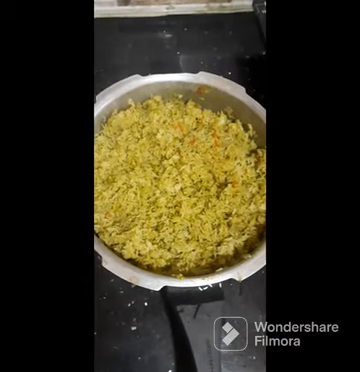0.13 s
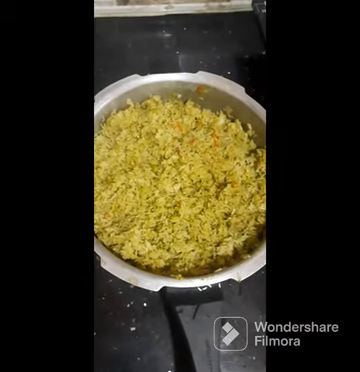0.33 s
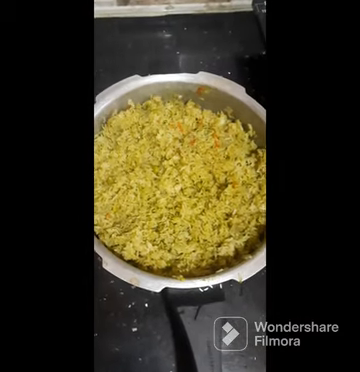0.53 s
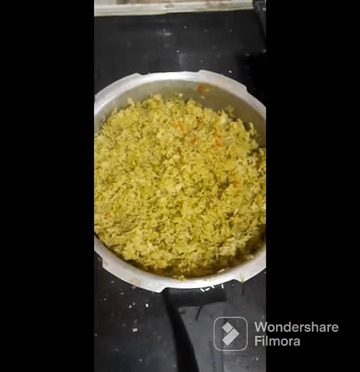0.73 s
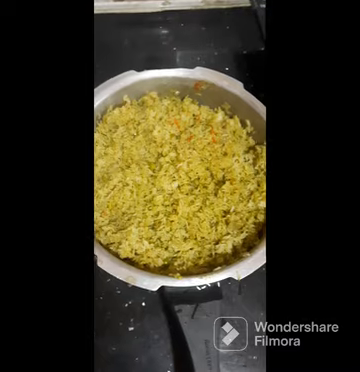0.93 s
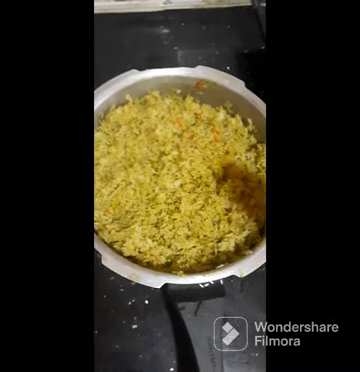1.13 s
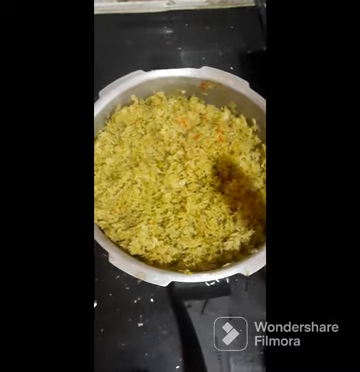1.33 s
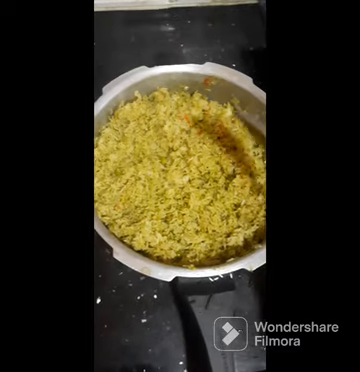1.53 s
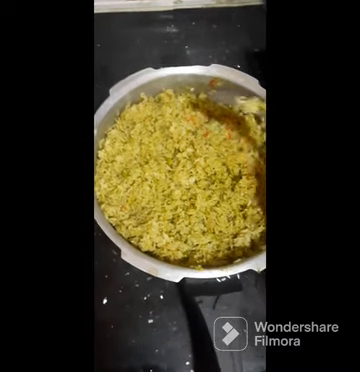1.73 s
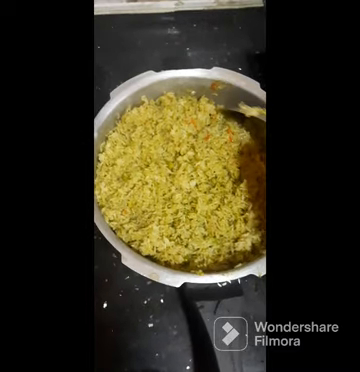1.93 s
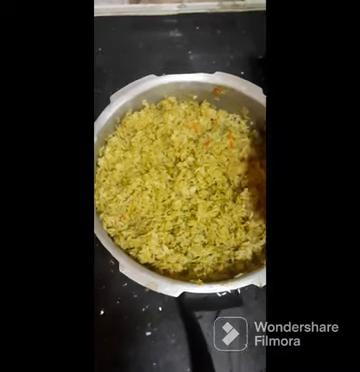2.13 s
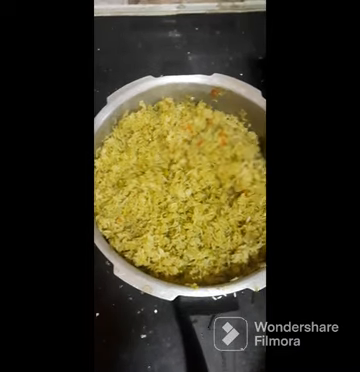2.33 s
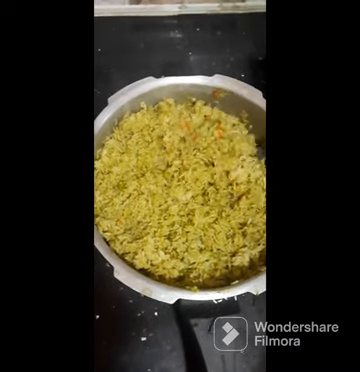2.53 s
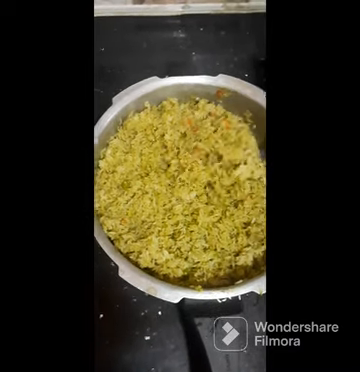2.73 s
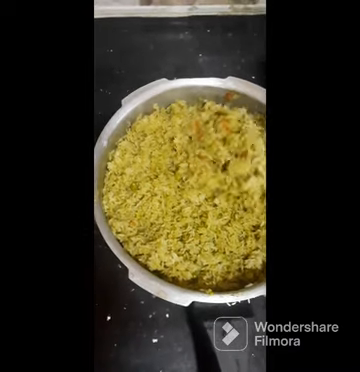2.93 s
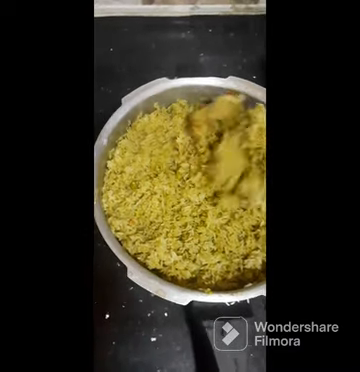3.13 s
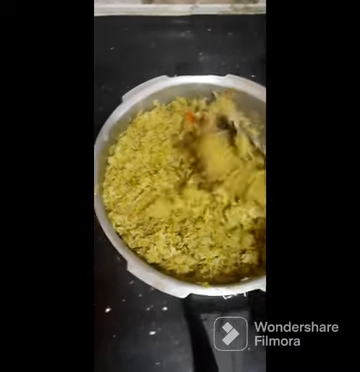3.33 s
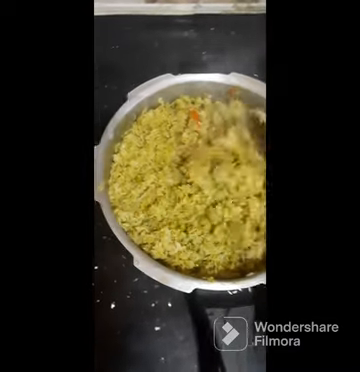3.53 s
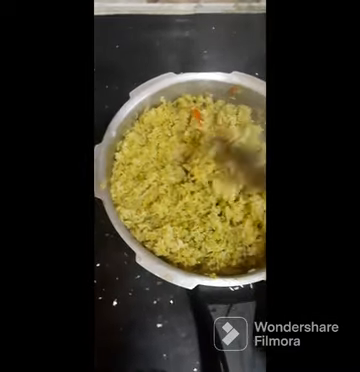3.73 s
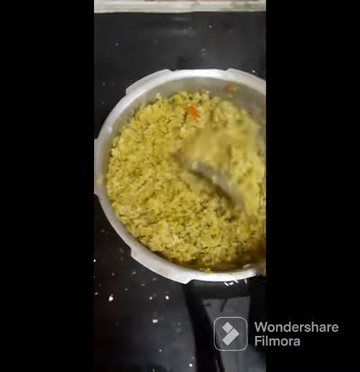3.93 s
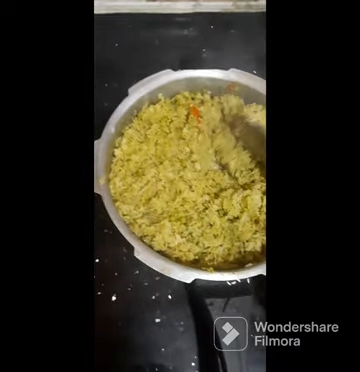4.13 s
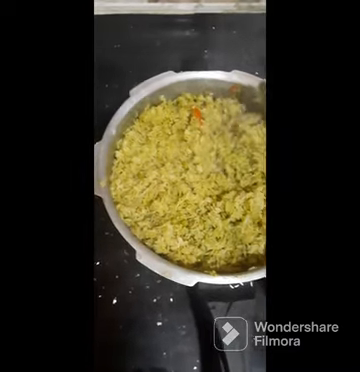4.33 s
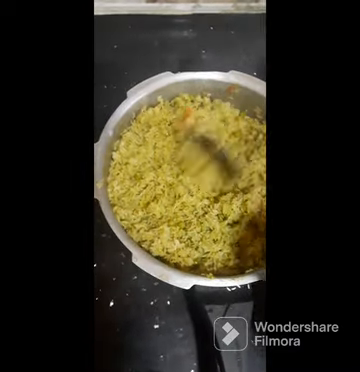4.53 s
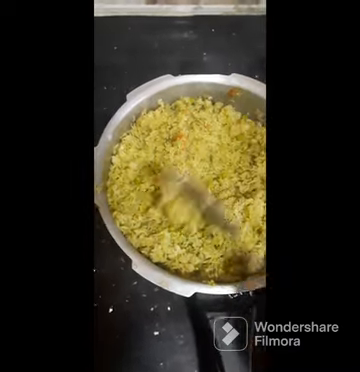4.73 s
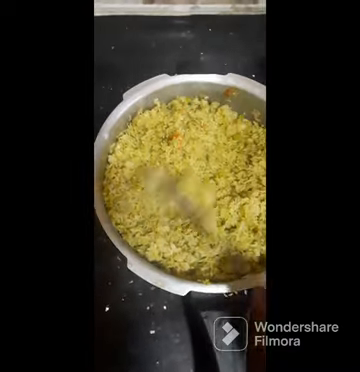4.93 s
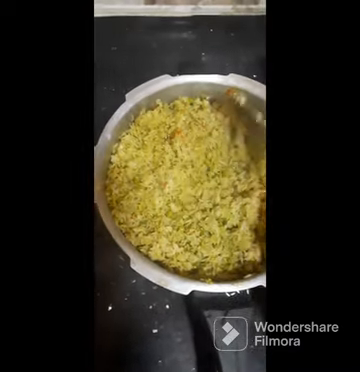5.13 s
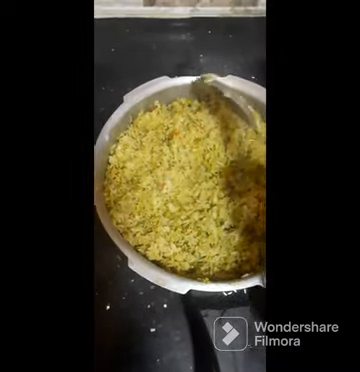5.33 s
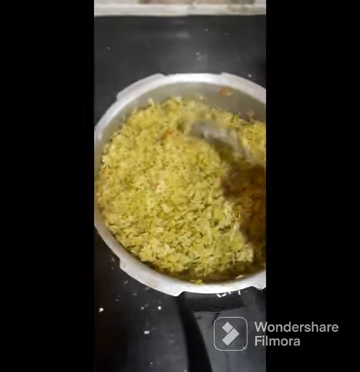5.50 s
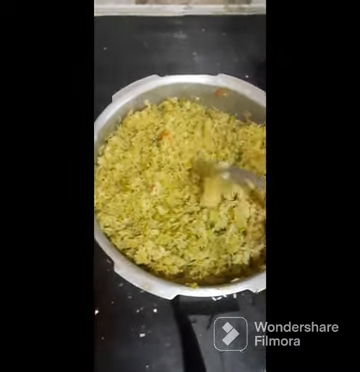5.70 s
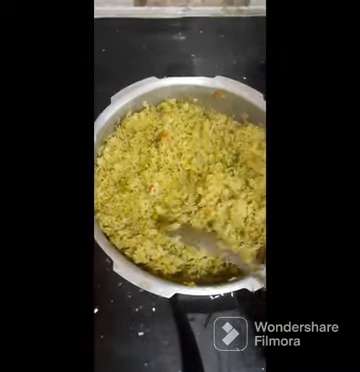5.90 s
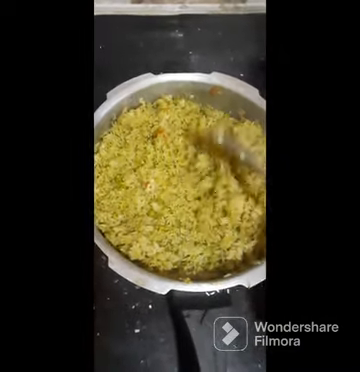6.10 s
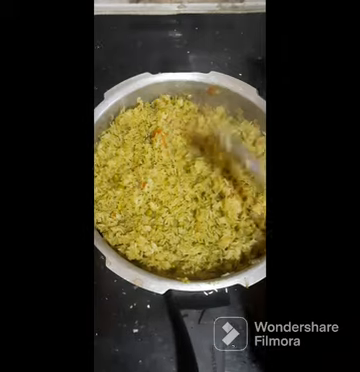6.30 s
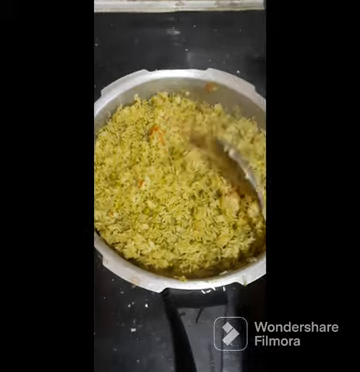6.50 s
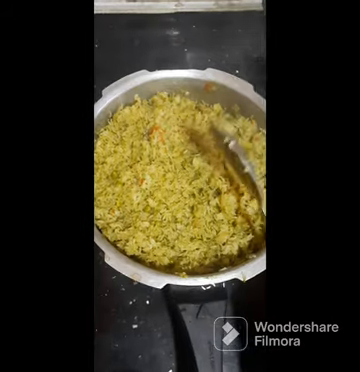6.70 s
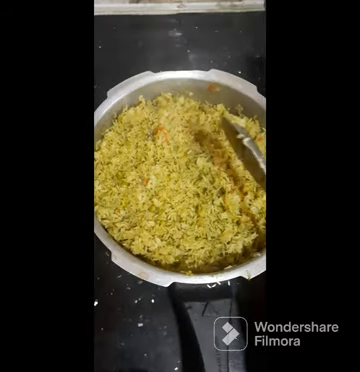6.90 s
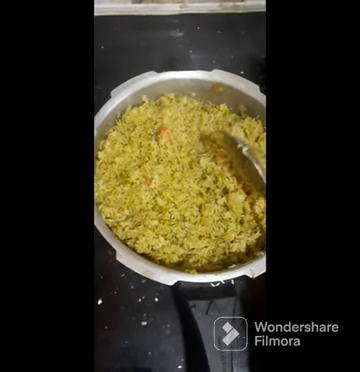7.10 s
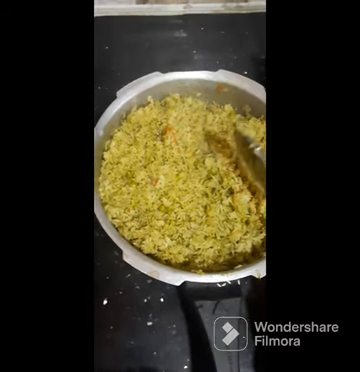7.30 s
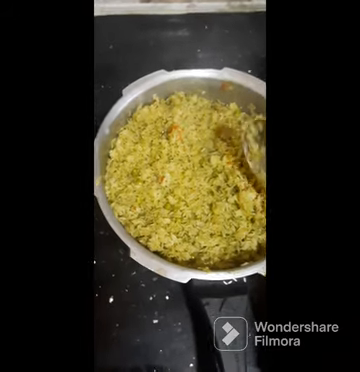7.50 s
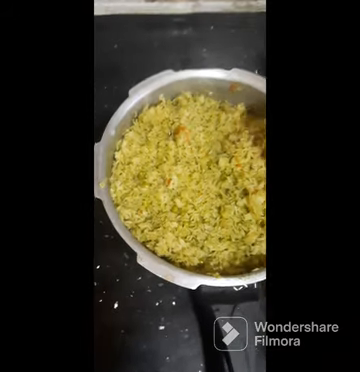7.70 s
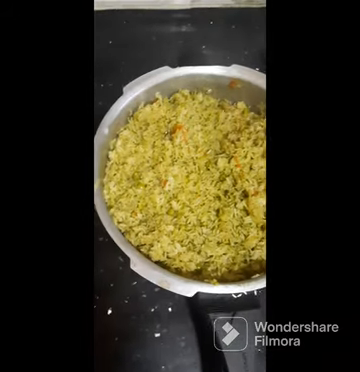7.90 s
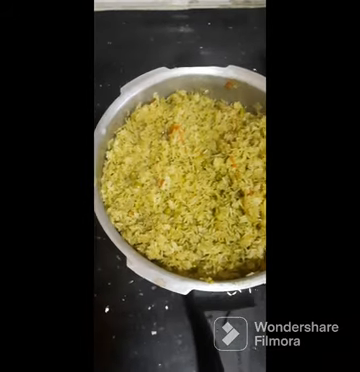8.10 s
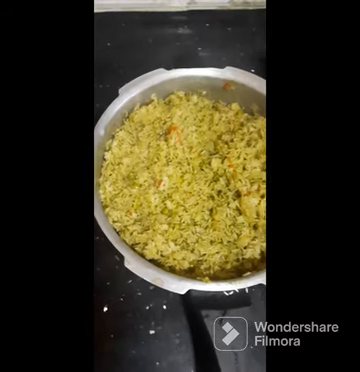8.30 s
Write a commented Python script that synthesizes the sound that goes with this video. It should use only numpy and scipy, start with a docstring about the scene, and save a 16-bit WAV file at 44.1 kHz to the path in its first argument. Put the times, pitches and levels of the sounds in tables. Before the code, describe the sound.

Close stereo pickup of rice being stirred in a metal pot on a stove. After a quiet second of faint whistle, rumble and bird chatter, a harsh bird call sounds, then the ladle knocks and grinds briefly against the wall. Soft, muffled folding and tiny grain crackles follow beneath lively two-note bird calls. Five strong clanks on the rim dominate near the end, ringing briefly in the hard small room.

```python
"""A low rumble, a thin whistle and far bird chatter come first, then near birds chirp and screech outside.
Cooked rice is turned with a metal ladle in an aluminium pot on a stove, in a small hard-walled kitchen:
the ladle clinks and scrapes down the wall, folds the rice softly, then raps the rim five times.
Metal is banks of decaying sines plus noise, rubbing and grains are random clicks, birds are
gliding harmonics, rumble and chatter are coloured noise, echoes are decaying noise."""
import sys
import numpy as np
from scipy import signal
from scipy.fft import rfft, irfft, next_fast_len
from scipy.io import wavfile

SR = 44100
rng = np.random.default_rng(int(sys.argv[2]) if len(sys.argv) > 2 else 0)


def persist_wave(psi):
    """Save psi, clipped to +-1, as 16-bit WAV."""
    counts = np.round(np.clip(psi, -1, 1) * 32767).astype(np.int16)
    wavfile.write(sys.argv[1], SR, np.atleast_2d(counts).T)


N = 368235
TIME = np.arange(N) / SR
RING_TIME = TIME[:SR]
CUTOFF_HZ = 15900


def amp(db):
    """Decibels to gain."""
    return 10 ** (np.asarray(db) / 20)


def rms_one(x):
    """Scale to unit power."""
    return x / np.sqrt(np.mean(x ** 2) + 1e-20)


def level_gain(rows):
    """Gain per sample from a (s, dB) curve."""
    s, db = np.transpose(rows)
    return amp(np.interp(TIME, s, db))


def at_hz(points, hz):
    """Read a table on a log-frequency axis."""
    f, value = np.transpose(points)
    return np.interp(np.log(np.maximum(hz, 1)), np.log(f), value)


def butter(x, hz, kind, order=2):
    """Causal Butterworth filter."""
    sos = signal.butter(order, np.clip(hz, 10, SR * .45), kind, fs=SR, output="sos")
    return signal.sosfilt(sos, x)


def band(x, hz, share, order=1):
    """Band-pass reaching a share of hz to either side."""
    return butter(x, [hz * (1 - share), hz * (1 + share)], "band", order)


def colour(x, spectrum):
    """Shape a signal by a (Hz, dB) table."""
    size = x.shape[-1]
    padded = next_fast_len(size, True)
    gain = amp(at_hz(spectrum, np.fft.rfftfreq(padded, 1 / SR)))
    return irfft(rfft(x, padded) * gain, padded)[..., :size]


def drift(rate_hz, size):
    """Smooth random wandering of spread near 1, with rate_hz knots a second."""
    knots = rng.standard_normal(size + 2)
    return np.interp(np.arange(size) * rate_hz / SR, np.arange(size + 2), knots)


# Likeness of the microphones in diffuse sound. Each row: frequency in Hz, left-right correlation.
LIKENESS = [(130, 0.91), (290, .88), (640, 0.36), (1400, 0.077), (4000, 0.064)]


def air(size):
    """White noise at two microphones: alike in the bass, nearly unrelated in the treble."""
    padded = next_fast_len(size, True)
    alike = np.clip(at_hz(LIKENESS, np.fft.rfftfreq(padded, 1 / SR)), 0, 1)
    mid, side = rfft(rng.standard_normal((2, padded)))
    pair = np.sqrt(1 + alike) * mid + np.sqrt(1 - alike) * side * [[1], [-1]]
    return rms_one(irfft(pair, padded)[:, :size])


def add(track, s, sound):
    """Mix a sound in at a time."""
    start = int(s * SR)
    track[..., start:start + sound.shape[-1]] += sound[..., :N - start]


def through(x, response):
    """Pass a signal through a stereo impulse response."""
    return signal.fftconvolve(np.atleast_2d(x), response, axes=-1)[:, :N]


def stroke(s, length_s, attack_s, t60_s):
    """Envelope of one movement: it builds, holds until its length is up, then dies away."""
    build = np.clip((TIME - s) / attack_s, 0, 1)
    return build * amp(-60 * np.clip((TIME - s - length_s) / t60_s, 0, 3))


def strokes(rows, attack_s, t60_s):
    """A run of movements as two gains per sample, one for each dB column."""
    return sum(amp(levels)[:, None] * stroke(s, length_s, attack_s, t60_s)
               for s, length_s, *levels in rows)


def slips(per_s, spread_db):
    """Random tiny clicks of uneven size and either sign."""
    sizes = amp(spread_db * np.minimum(rng.exponential(1, N), 4)) * rng.choice([-1, 1], N)
    return rms_one(sizes * (rng.random(N) < per_s / SR))


def ring(modes, spread_hz=1100, build_cycles=1.0):
    """Modes of alternating sign swell within a cycle or so; higher ones differ more in phase by side."""
    out = 0
    for k, (hz, db, t60_s) in enumerate(modes):
        lead = rng.choice([-1, 1]) * np.pi / 4 * min(hz / spread_hz, 1) * np.array([[1], [-1]])
        build = 1 - np.exp(-RING_TIME * hz / build_cycles)
        envelope = amp(db - 60 * RING_TIME / t60_s) * build
        out = out + (-1) ** k * envelope * np.sin(2 * np.pi * hz * RING_TIME + lead)
    return out


# Flock's own level. Each row: time in seconds, level in dB.
FLOCK_LEVEL = [(0, -62.5), (1.3, -63), (1.9, -65.5), (3.1, -65), (4.3, -52.5), (5.4, -64.5), (8.35, -78.5)]
# Flock's rise with each near call: gain over the call, time constants before and after its middle.
ANSWER_DB, ANSWER_LEAD_S, ANSWER_LAG_S = -8, 0.041, 0.078


def flock_gain():
    """The far flock grows louder around every near call, in step with the call's energy."""
    power = level_gain(FLOCK_LEVEL) ** 2
    for s, length_s, hz, db, *_ in TWO_NOTE_CALLS + PEEPS:
        since = TIME - s - length_s / 2
        nearness = np.exp(-np.maximum(since / ANSWER_LAG_S, -since / ANSWER_LEAD_S))
        power = power + amp(db + ANSWER_DB) ** 2 * nearness * length_s / (ANSWER_LEAD_S + ANSWER_LAG_S)
    return np.sqrt(power)


# Rumble over time. Each row: time in seconds, level in dB.
RUMBLE_LEVEL = [(0, -61), (2, -58), (4, -57.5), (6, -61.5), (8.35, -63)]
# Rumble spectrum. Each row: frequency in Hz, relative density in dB per Hz.
RUMBLE_COLOUR = [(25, -22.5), (50, -10.5), (88, 3), (130, -8), (220, -6.5), (430, -8.5), (620, -19.5),
                 (1200, -31.5), (4000, -20), (9000, -51), (16000, -50.5)]
# Far flock spectrum. Each row: frequency in Hz, relative density in dB per Hz.
FLOCK_COLOUR = [(1400, -19), (2200, -3), (2700, -5.5), (3400, 3.5), (4400, -2.5), (5500, -17),
                (7200, -13.5), (8200, -33.5), (12000, -35.5)]
# Far whistle's two tones. Each row: frequency in Hz, relative level in dB.
WHISTLE_TONES = [(1604, -0.5), (2500, -3)]
WHISTLE_DB, WHISTLE_ENDS_S, WHISTLE_ATTACK_S, WHISTLE_T60_S = -69.5, 0.79, 0.0093, 0.95


def background(whistle_half_width_hz=25):
    """Coloured noise for rumble and blurred far birds; narrow noise bands for the whistle."""
    rumble = level_gain(RUMBLE_LEVEL) * rms_one(colour(air(N), RUMBLE_COLOUR))
    flock = flock_gain() * rms_one(colour(air(N), FLOCK_COLOUR)) * amp(2 * drift(22, N))
    whistle = 0
    for hz, db in WHISTLE_TONES:
        edges_hz = [hz - whistle_half_width_hz, hz + whistle_half_width_hz]
        whistle = whistle + amp(db) * rms_one(butter(air(N), edges_hz, "band", order=1))
    held = stroke(0, WHISTLE_ENDS_S, WHISTLE_ATTACK_S, WHISTLE_T60_S)
    return rumble + flock + amp(WHISTLE_DB) * held * whistle


# Bird's throat. Each row: frequency in Hz, gain in dB.
THROAT = [(1500, -19), (2300, -10.5), (3200, 4.5), (4600, 0), (5800, -5.5), (7100, -9), (8300, -25.5),
          (11500, -28), (15000, -49)]


def note(length_s, top_hz, drop, harsh, crest, scoop=.22, flutter_db=2.5, half_lines_db=-5):
    """Pitch leaps, arches, falls; the throat shapes harmonics; shaky pitch and half lines make it harsh."""
    size, harsh = int(length_s * SR), np.clip(harsh, 0, 1)
    u = np.linspace(0, 1, size)
    shake, flutter = drift(900, SR)[:size], drift(160, SR)[:size]
    rise, fall = np.maximum(1 - u / crest, 0), np.maximum(u - crest, 0) / (1 - crest)
    arch_hz = top_hz * (1 - scoop * rise ** 2 - drop * fall ** 1.6)
    phase = 2 * np.pi * np.cumsum(arch_hz * (1 + .135 * harsh ** 1.65 * shake)) / SR
    lines = []
    for k in np.arange(1, 7.5, .5):
        line_hz = k * arch_hz
        lines.append(amp(at_hz(THROAT, line_hz)) * (line_hz < CUTOFF_HZ) * np.sin(k * phase))
    # even places hold whole harmonics, odd places the half lines between
    voice = sum(lines[::2]) + harsh * amp(half_lines_db) * sum(lines[1::2])
    swell = np.sqrt(np.abs(np.sin(np.pi * u))) * (1 - rise)
    return rms_one(voice * swell * amp(flutter_db * flutter))


# High note breaking into a lower falling one. Each row: start in seconds, length in seconds,
# top pitch of the low note in Hz, low note in dB, high note in dB, harshness 0-1.
TWO_NOTE_CALLS = [(0.904, 0.21, 2288, -46.5, -49, 0.86), (2.666, .13, 2390, -55, -57.5, .35),
                  (3.319, .14, 2367, -56.5, -54, 0.43), (3.539, .14, 2392, -50.5, -52.5, 0.47),
                  (3.886, .11, 2193, -48.5, -51.5, 0.7), (3.947, 0.14, 2153, -46, -49, 0.96),
                  (4.044, 0.11, 2047, -51, -49, 0.17), (4.38, .115, 2210, -52, -48, 0.39),
                  (4.498, 0.13, 2388, -47, -47.5, .2), (5.029, .14, 2458, -47, -47.5, 0.58),
                  (5.448, .145, 2422, -46.5, -50.5, .35), (7.695, 0.16, 2340, -47, -50.5, 0.88),
                  (8.13, 0.19, 2420, -54.5, -56.5, 0.77)]
# Single falling notes. Each row: start in seconds, length in seconds, top pitch in Hz, level in dB.
PEEPS = [(.05, 0.17, 2730, -65), (0.291, 0.18, 2610, -67.5), (.53, .19, 2520, -66.5),
         (0.759, 0.15, 2474, -64.5), (4.22, .065, 2120, -57.5), (5.79, 0.11, 2450, -69.5),
         (6.159, 0.11, 2104, -65), (7.188, .088, 2400, -49.5), (7.306, 0.077, 2116, -54)]
HIGH_ENDS, LOW_STARTS = .52, .38   # shares of the call's length
HIGH_RATIO = 1.49   # high pitch over low
HIGH_FALL, LOW_FALL = 0.141, .35   # shares of pitch lost by the end of a clean note
HARSH_HOLDS = .7   # share of that fall lost at full harshness
HIGH_CREST, LOW_CREST = .48, .26   # share of each note spent rising
PEEP_FALL, PEEP_HARSH = .32, .55


def birds():
    """Two-note calls, which fall less the harsher they are, and single peeps."""
    out = np.zeros(N)
    for s, length_s, hz, low_db, high_db, harsh in TWO_NOTE_CALLS:
        sag = 1 - HARSH_HOLDS * harsh ** 2
        high = note(HIGH_ENDS * length_s, HIGH_RATIO * hz, HIGH_FALL * sag, harsh, HIGH_CREST)
        low = note((1 - LOW_STARTS) * length_s, hz, LOW_FALL * sag, harsh, LOW_CREST)
        add(out, s, amp(high_db) * high)
        add(out, s + LOW_STARTS * length_s, amp(low_db) * low)
    for s, length_s, hz, db in PEEPS:
        add(out, s, amp(db) * note(length_s, hz, PEEP_FALL, PEEP_HARSH, LOW_CREST))
    return out


# Ladle folds the rice. Each row: start in seconds, length in seconds, soft thudding in dB,
# sticky crackle in dB.
FOLDS = [(1.25, 0.49, -63.5, -95), (2.15, 0.78, -57.5, -72), (3.17, 0.43, -61.5, -68),
         (4.14, 0.076, -59.5, -67.5), (4.54, 0.21, -68, -66.5), (5.01, 0.3, -59, -76),
         (5.47, 0.21, -68, -68.5), (7.5, .2, -74, -94), (8.03, 0.26, -79, -78)]
# Thud spectrum. Each row: frequency in Hz, relative density in dB per Hz.
RICE_BODY = [(100, -9), (250, 1.5), (600, 3), (950, -5.5), (1500, -17), (3000, -31.5)]
# Crackle spectrum. Each row: frequency in Hz, relative density in dB per Hz.
RICE_CRACKLE = [(2000, -21.5), (6000, 3.5), (10000, -6.5), (14000, -5), (17000, -2.5)]
FOLD_ATTACK_S, FOLD_T60_S = 0.07, 0.53
SETTLING_DB = -78   # faint steady crackle from the first drag on


def rice():
    """Soft clumps tumble while sticky grains part with tiny clicks."""
    thud, crackle = strokes(FOLDS, FOLD_ATTACK_S, FOLD_T60_S)
    crackle = crackle + amp(SETTLING_DB) * (TIME > DRAGS[0][0])
    clumps = rms_one(colour(air(N), RICE_BODY)) * amp(2.7 * drift(35, N))
    clicks = np.array([slips(per_s=2100, spread_db=4.5) for side in range(2)])
    grains = rms_one(colour(clicks, RICE_CRACKLE)) * amp(0.63 * drift(31, N))
    return thud * clumps + crackle * grains


# Light touches of the ladle's edge. Each row: start in seconds, level in dB, pitch in Hz, t60 in seconds.
TICKS = [(1.262, -59, 7100, .04), (2.797, -59, 12000, .03), (3.474, -48, 6960, 0.1),
         (4.735, -62, 9000, 0.022), (6.177, -43.5, 14000, 0.16), (6.356, -51.5, 7270, 0.064),
         (8.09, -60, 7200, 0.075)]


def ticks(width=0.015, splash_db=-5):
    """Glancing touches: one high resonance in a short bright splash."""
    out = np.zeros((2, N))
    for s, db, hz, t60_s in TICKS:
        noise = air(len(RING_TIME))
        tone = rms_one(band(noise, hz, width))
        splash = rms_one(butter(noise, 5500, "high"))
        add(out, s, (tone + amp(splash_db) * splash) * amp(db - 60 * RING_TIME / t60_s))
    return out


# Pot's crowd of short-lived modes. Each row: frequency in Hz, relative density in dB per Hz.
CLASH = [(200, -10), (350, -4.5), (480, -4.5), (750, -1), (1250, -5), (2000, -18), (3000, -21), (4000, -16),
         (5800, -15), (7200, -12.5), (8300, -27.5), (11500, -20), (15500, -33)]


def clash(level_db=-15, chatter_s=0.0064, t60_s=0.072, crack=1.0, crack_s=0.003):
    """The metals crack together and chatter for a few ms; then the crowd of modes dies."""
    envelope = amp(level_db - 60 * np.maximum(RING_TIME - chatter_s, 0) / t60_s)
    noise = rms_one(colour(air(len(RING_TIME)), CLASH))
    bright = butter(noise, 2500, "high", order=1)
    return envelope * (noise + crack * np.exp(-RING_TIME / crack_s) * bright)


# Ladle on pot. Each row: start in seconds, pot in dB, bass boost in dB, treble boost in dB,
# ladle ring in dB, pitch favoured by the contact point in Hz.
KNOCKS = [(1.990, -20, -24, 4.5, -26, 4700), (2.056, -37, 4, -18, -44, 1600),
          (2.433, -18.5, -2, -5.5, -42.5, 6800), (6.612, 0.5, 1, -3, -32.5, 5200),
          (6.776, 0.5, 0.5, 0.5, -34, 5140), (6.935, 0.5, -2, 0.5, -34.5, 4100),
          (7.094, -4.5, 3, 3.5, -36, 4300), (7.374, 0, -3.5, -9, -37.5, 3980)]
# Pot full of rice. Each row: frequency in Hz, relative level in dB, undamped t60 in seconds.
POT_MODES = [(89.2, -22, 0.28), (107.1, -26.5, 0.23), (156.1, -31.5, .35), (203, -27, 0.11),
             (231, -25, 0.17), (326, -22, 0.17), (366.8, -23, 0.18), (440, -28, 0.16), (561, -31, 0.1),
             (673, -16, .06), (720, -41.5, 0.52), (904, -21, 0.059), (1339.5, -24, 0.1), (1550, -31, .12),
             (2404, -35.5, 0.089), (3530, -40.5, 0.082), (4835, -42, .16), (5012, -43, .16),
             (5190, -51, 0.14), (5800, -32.5, 0.14), (5720, -32.5, 0.15), (5700, -48, .14),
             (6342, -43, .14), (6850, -51.5, 0.078)]
# Ladle and handle. Each row: frequency in Hz, relative level in dB, t60 in seconds.
LADLE_MODES = [(263, -1, 0.27), (687, -1, 0.16), (1600, -12, 0.23), (2200, -10.5, 0.13), (2680, 3, 0.046),
               (2940, -4, 0.065), (3940, -8.5, 0.071), (5140, -8.5, 0.1), (7520, -9.5, 0.098)]


def knocks(bass_hz=170, treble_hz=2200, lowest_hz=50, contact_gain=1.19, contact_width=0.09):
    """Blows rock the whole pot; harder contact adds treble; the ladle rings too."""
    out = np.zeros((2, N))
    # the ladle's bowl is not quite round, so its modes come in close pairs
    twins = [(hz * 0.97, db, t60_s) for hz, db, t60_s in LADLE_MODES]
    ladle = ring(LADLE_MODES, build_cycles=2.2) + amp(-4.5) * ring(twins, build_cycles=2.0)
    for s, pot_db, bass_db, treble_db, ladle_db, contact_hz in KNOCKS:
        blow = clash() + amp(2.0) * ring(POT_MODES, build_cycles=0.55)
        blow = blow + (amp(bass_db) - 1) * butter(blow, bass_hz, "low", order=1)
        blow = blow + (amp(treble_db) - 1) * butter(blow, treble_hz, "high", order=1)
        blow = blow + contact_gain * band(blow, contact_hz, contact_width)
        add(out, s, amp(pot_db) * blow + amp(ladle_db) * ladle)
    return butter(out, lowest_hz, "high")


# Ladle dragged along the wall. Each row: start in seconds, length in seconds, grinding in dB,
# scratching in dB.
DRAGS = [(2.0, 0.075, -38, -49), (2.105, 0.038, -50, -43), (2.265, 0.16, -42.5, -60.5),
         (2.46, 0.06, -37.5, -53), (2.56, .17, -53.5, -65)]
DRAG_ATTACK_S, DRAG_T60_S = 0.02, 0.15


def scrape(grind_low_hz=170, grind_high_hz=540, scratch_hz=1500, damping=0.29):
    """Stick and slip shakes the pot wall, which the pressing ladle damps."""
    grind, scratch = strokes(DRAGS, DRAG_ATTACK_S, DRAG_T60_S)
    wall = ring([(hz, db, t60_s * damping) for hz, db, t60_s in POT_MODES])
    body = clash() + amp(5.5) * wall + amp(-30.0) * ring(LADLE_MODES)
    rub = through(slips(per_s=810, spread_db=2.5), body)
    low_rub = rms_one(butter(rub, [grind_low_hz, grind_high_hz], "band", order=1))
    high_rub = rms_one(butter(rub, scratch_hz, "high"))
    return grind * low_rub + scratch * high_rub


# Stand's resonances. Each row: frequency in Hz, damping in 1/s (t60 is 20 over it), relative level in dB.
STAND = [(228.4, 21, 1), (479, 24, -7), (592, 31, -3.5), (790, 49, -8.5), (1064, 38, -2.5),
         (1490, 110, -8.5), (2220, 28, -21.5)]
SHIFT_S, SHIFT_LENGTH_S, SHIFT_DB, SHIFT_ATTACK_S, SHIFT_T60_S = 2.835, 0.039, -35, 0.015, 0.23


def shift(grit_db=-9, grit_low_hz=500, grit_high_hz=1250):
    """One short push: the pot settles on its stand with a dull, slightly gritty thud."""
    push = np.zeros((2, N))
    add(push, SHIFT_S, ring([(hz, db, 20 / damping) for hz, damping, db in STAND]))
    grit = rms_one(butter(slips(per_s=2000, spread_db=1.5), [grit_low_hz, grit_high_hz], "band"))
    envelope = stroke(SHIFT_S, SHIFT_LENGTH_S, SHIFT_ATTACK_S, SHIFT_T60_S)
    return amp(SHIFT_DB) * envelope * (amp(-0.5) * push + amp(grit_db) * grit)


def near_walls(t60_s=0.0111):
    """A short cluster of early reflections, different at each microphone; unit energy."""
    echoes = air(len(RING_TIME)) * amp(-60 * RING_TIME / t60_s)
    return echoes / np.sqrt(np.sum(echoes ** 2) / 2)


# Room decay. Each row: frequency in Hz, t60 in seconds.
ROOM_T60 = [(100, 0.79), (400, 0.38), (1500, 0.46), (5000, 0.54), (9000, 0.32), (15000, 0.26)]
# Room tone. Each row: frequency in Hz, gain in dB.
ROOM_COLOUR = [(60, -3.5), (250, 0), (800, 0), (5000, -0.5), (14000, -0.5)]


def kitchen(first_echo_s=0.006):
    """Diffuse echoes that die band by band; unit energy."""
    noise, tail = colour(air(len(RING_TIME)), ROOM_COLOUR), 0
    for hz in 125 * 2 ** np.arange(8):
        # peel off one octave at a time from the bottom
        split = signal.butter(2, min(hz * np.sqrt(2), SR * .49), fs=SR, output="sos")
        low = signal.sosfiltfilt(split, noise)
        tail = tail + low * amp(-60 * RING_TIME / at_hz(ROOM_T60, hz))
        noise = noise - low
    tail = tail * np.clip(RING_TIME / first_echo_s - 1, 0, 1)
    return tail / np.sqrt(np.sum(tail ** 2) / 2)


# Stereo balance. Each row: frequency in Hz, left minus right in dB at full share.
BALANCE = [(100, 0), (200, 0.5), (400, -1), (700, -4.5), (1300, 1), (2400, 1.5), (4400, 0.5), (6000, -9.5),
           (8100, 2.5), (14000, 8)]


def lean(pair, share=1):
    """Each microphone favours its own bands."""
    sides = []
    for x, sign in zip(pair, (1, -1)):
        sides.append(colour(x, [(hz, sign * share * db / 2) for hz, db in BALANCE]))
    return np.array(sides)


def scene():
    """The pot is close; the birds arrive largely by way of the walls."""
    room = kitchen()
    calls = birds()
    calls = amp(-5) * calls + amp(-1.0) * through(calls, near_walls()) + amp(-4) * through(calls, room)
    touches = ticks() + shift()
    touches = touches + amp(-11) * through(butter(touches, 370, "high"), room)
    pot = knocks() + scrape()
    pot = pot + amp(-9.5) * through(pot, room)
    return lean(pot) + lean(touches + calls + rice() + background(), share=0.91)


def record(dry):
    """Peaks are rounded, the top is cut."""
    rounded = 1.128 * np.tanh(dry / 1.098)
    return signal.sosfilt(signal.ellip(10, .2, 80, CUTOFF_HZ, fs=SR, output="sos"), rounded)


dry = scene()
out = record(dry)
persist_wave(out)
```